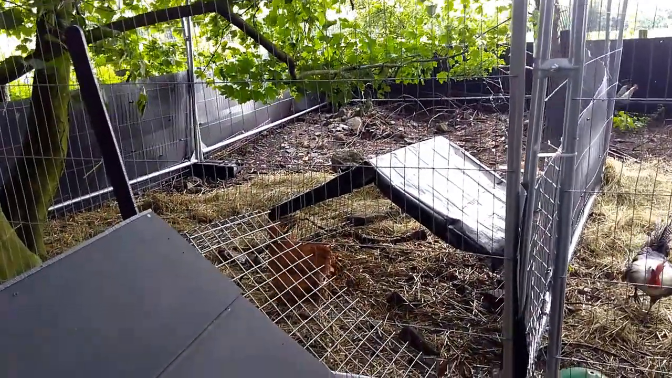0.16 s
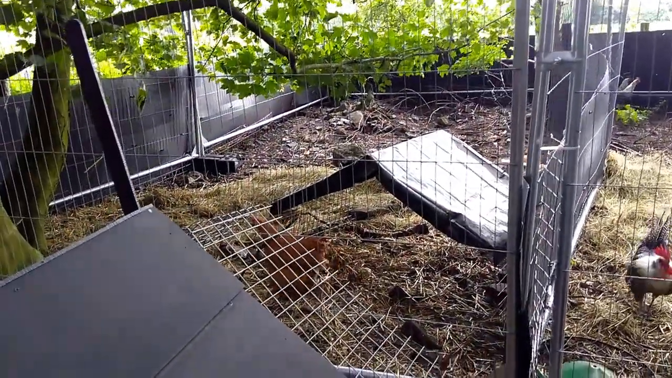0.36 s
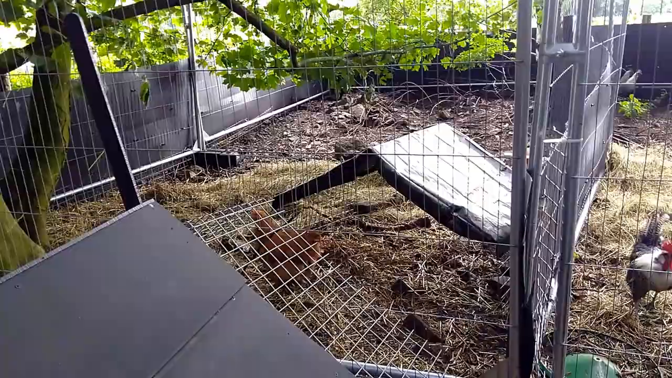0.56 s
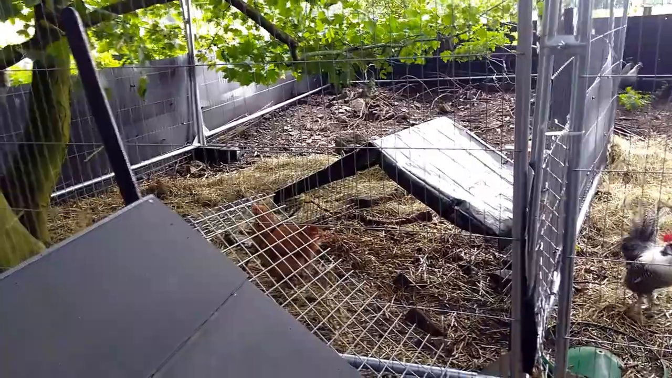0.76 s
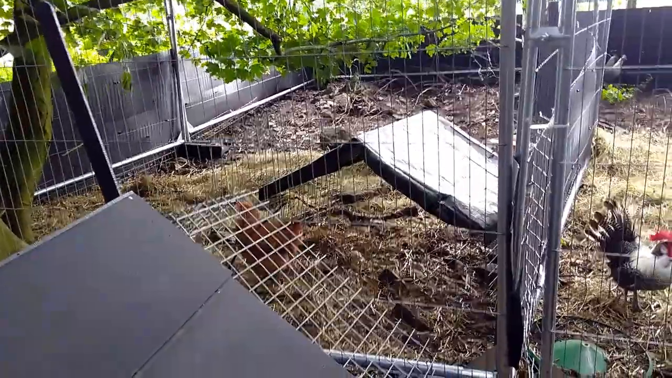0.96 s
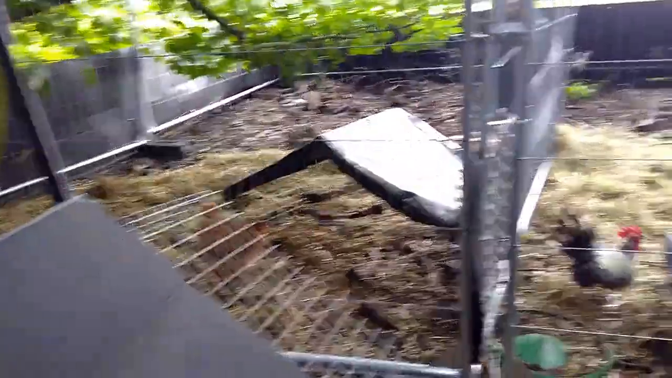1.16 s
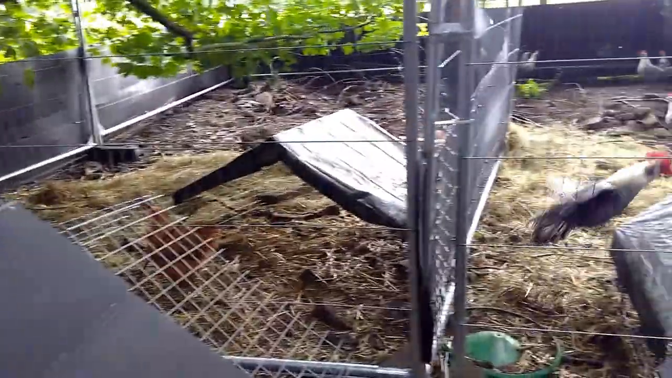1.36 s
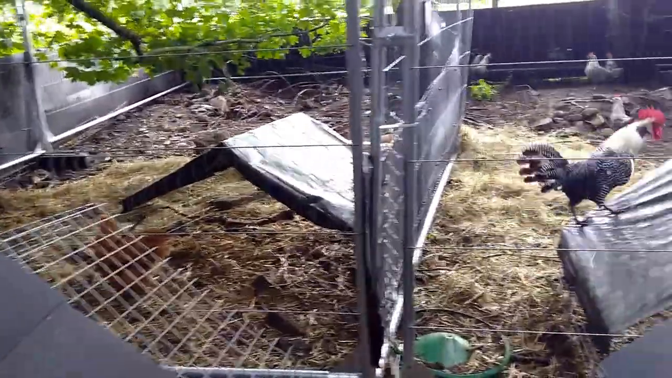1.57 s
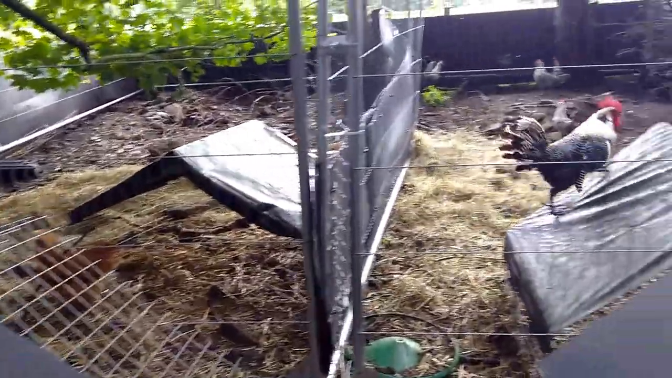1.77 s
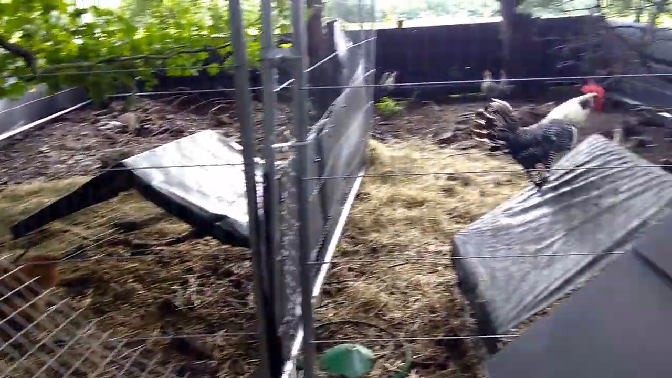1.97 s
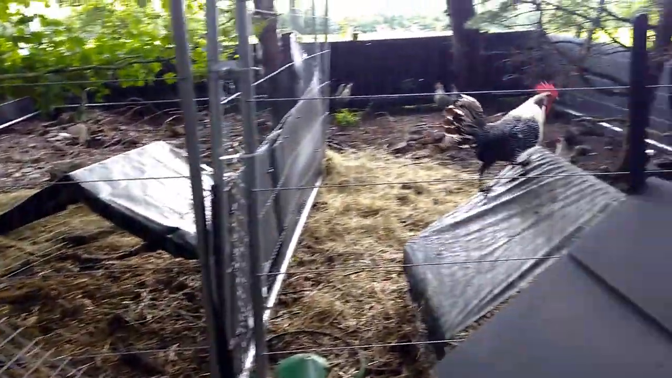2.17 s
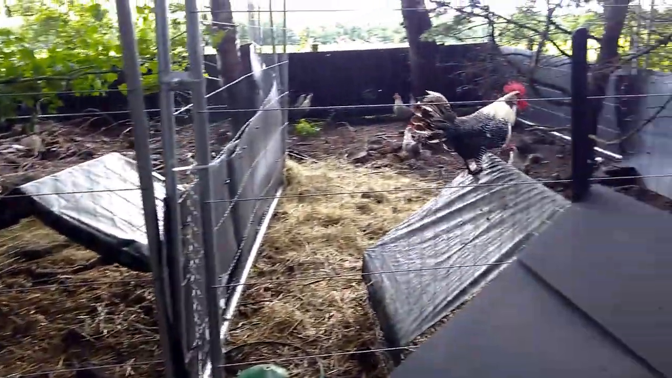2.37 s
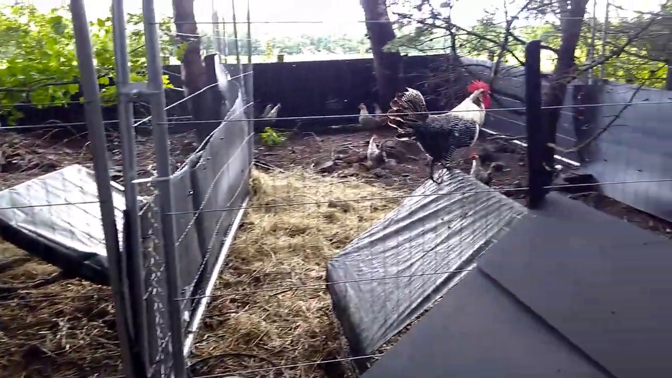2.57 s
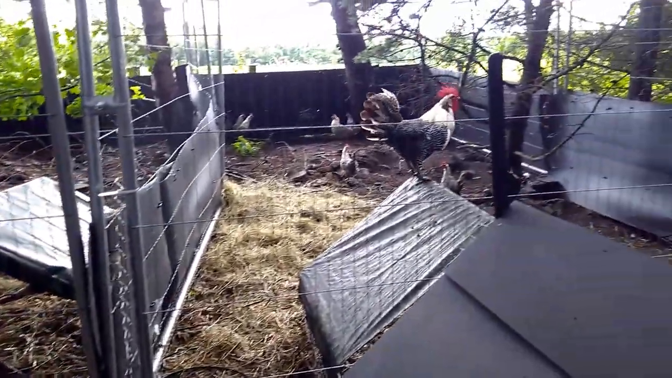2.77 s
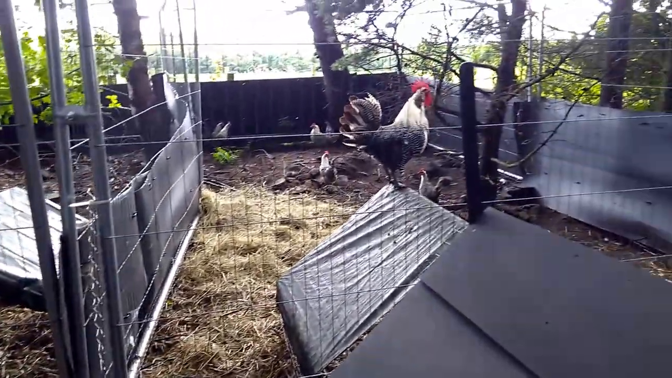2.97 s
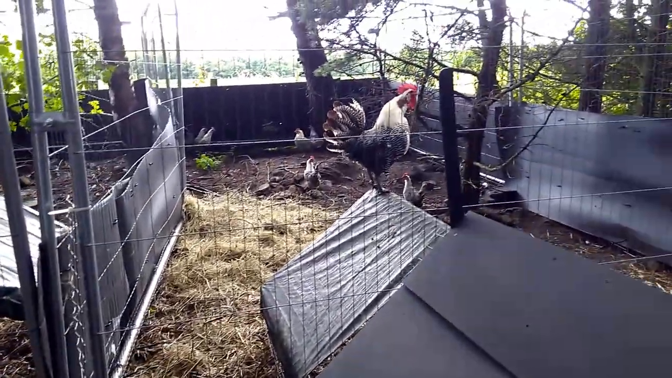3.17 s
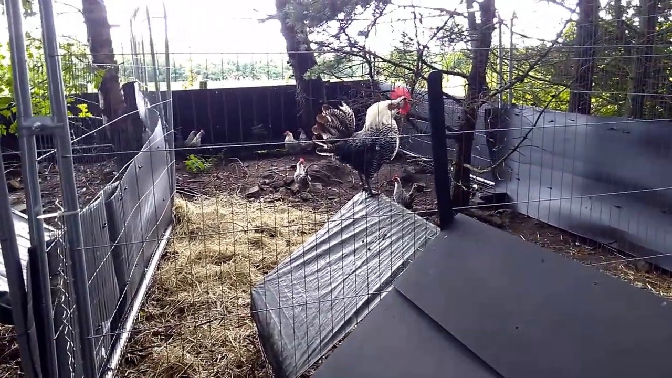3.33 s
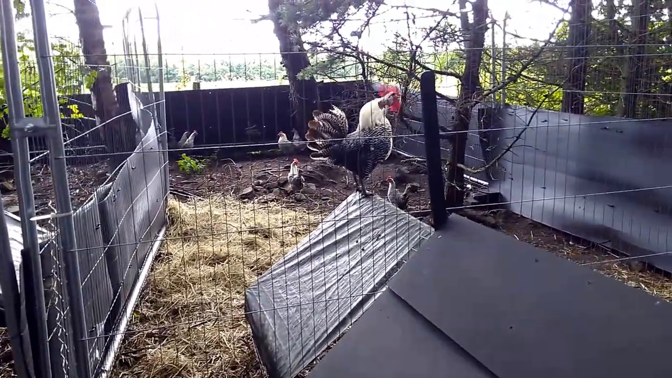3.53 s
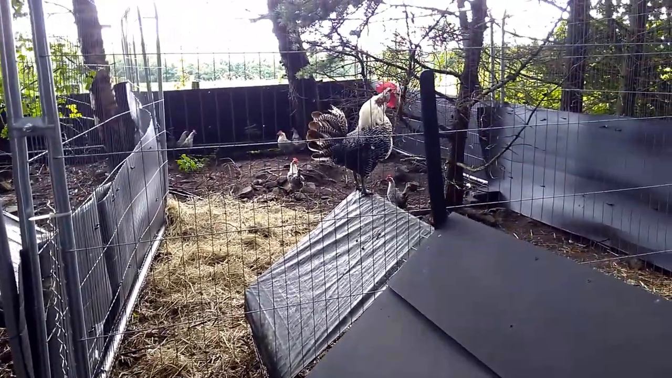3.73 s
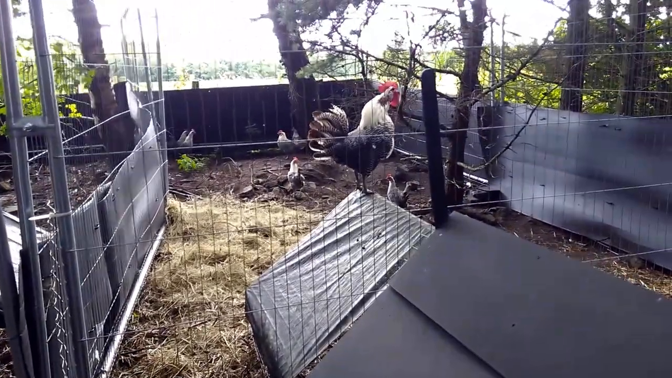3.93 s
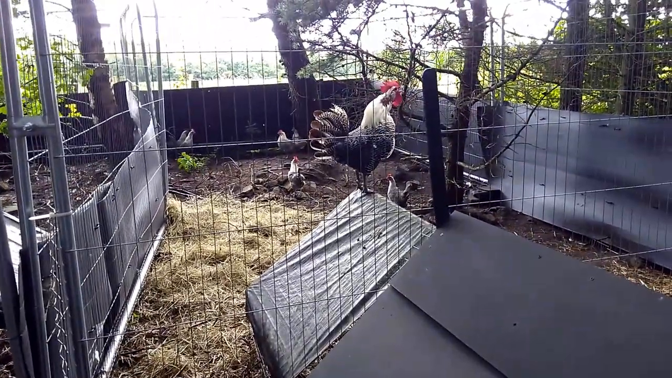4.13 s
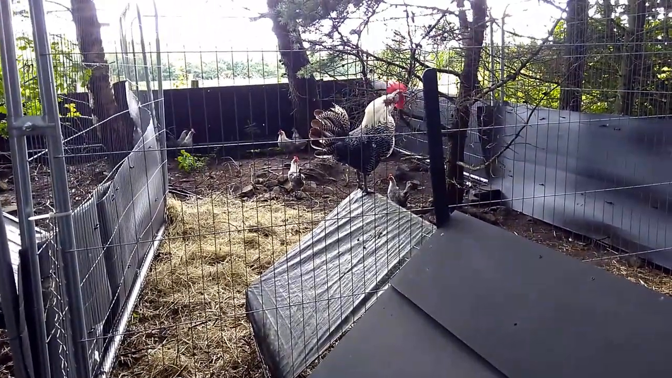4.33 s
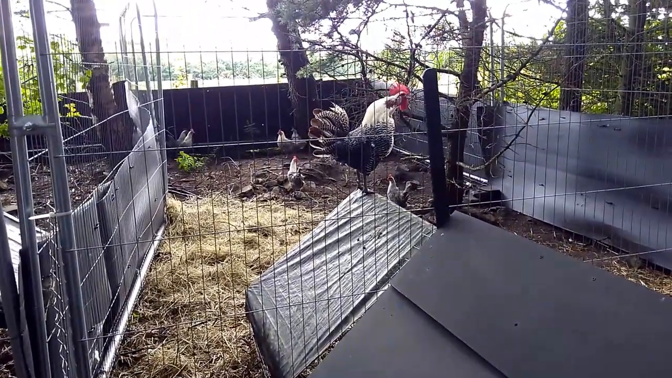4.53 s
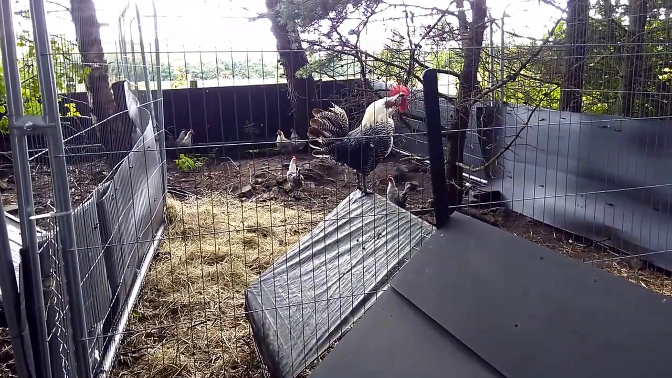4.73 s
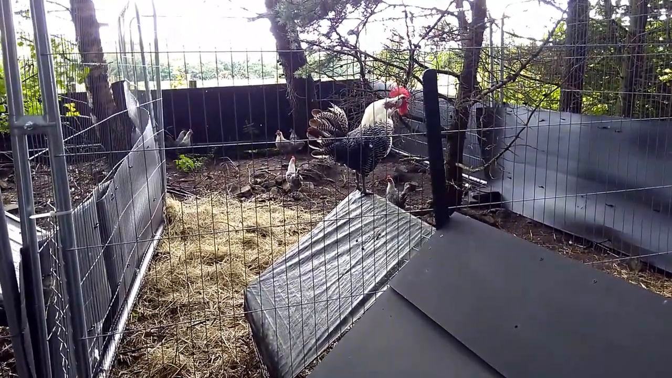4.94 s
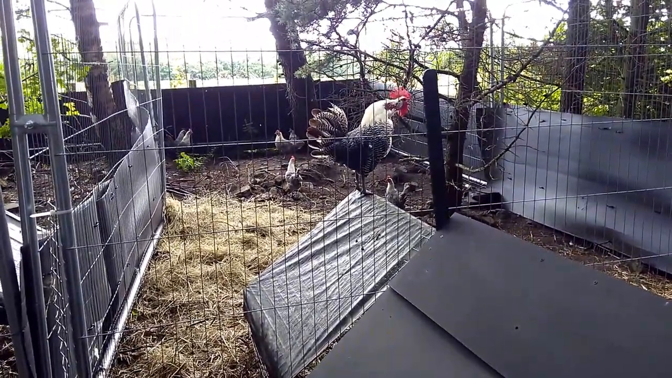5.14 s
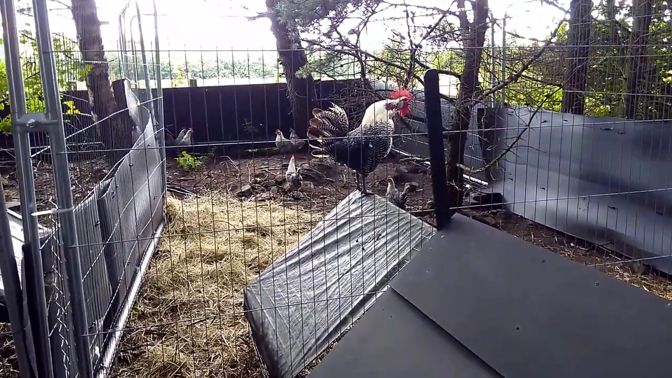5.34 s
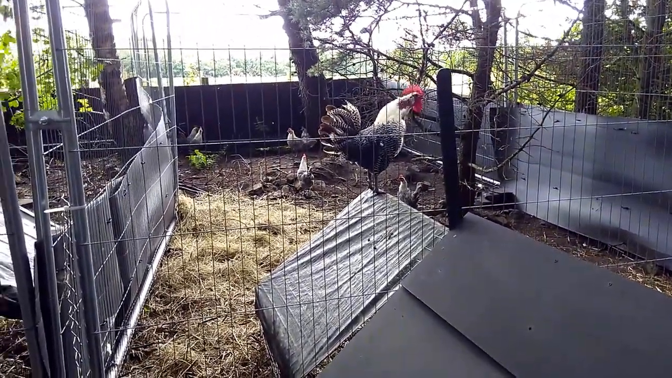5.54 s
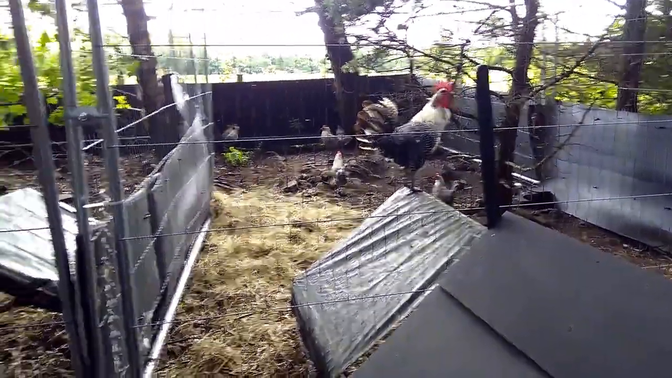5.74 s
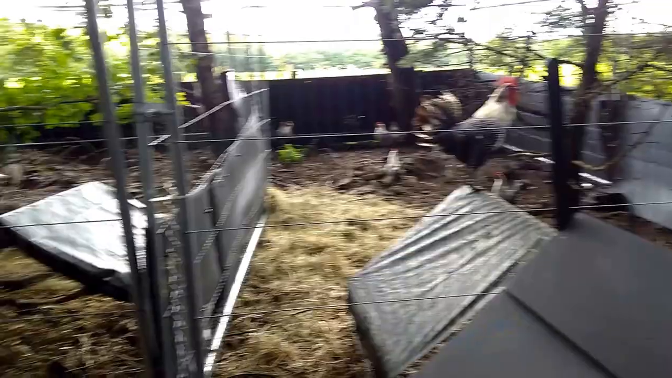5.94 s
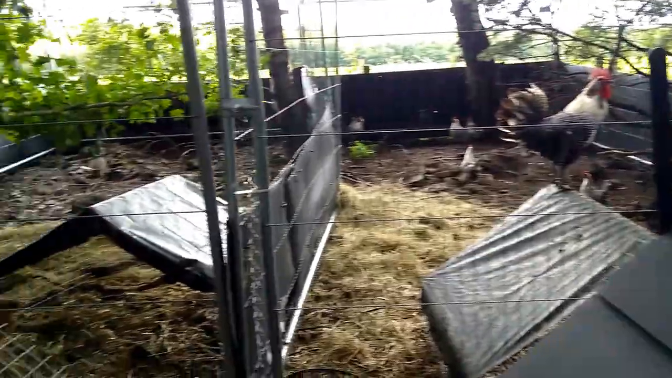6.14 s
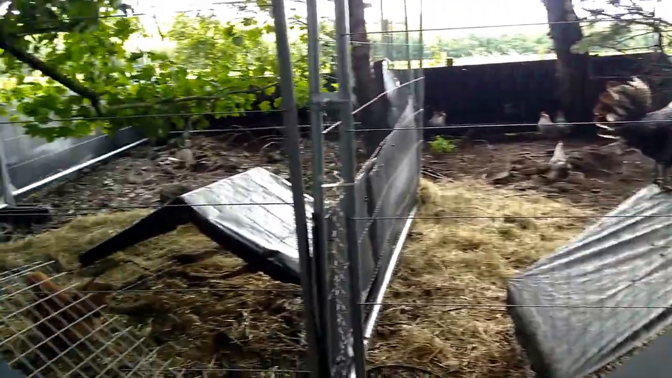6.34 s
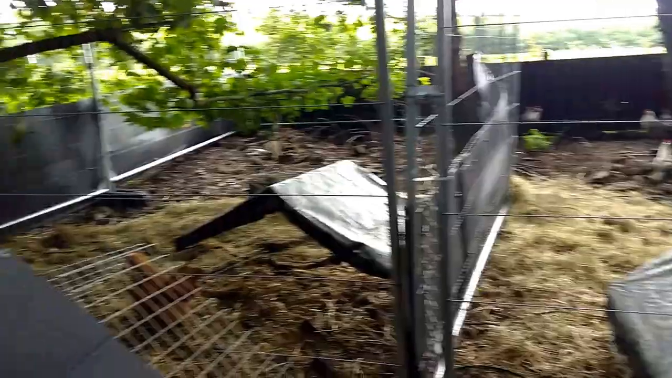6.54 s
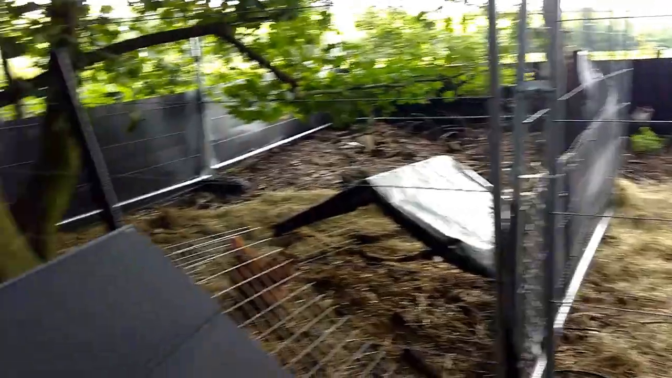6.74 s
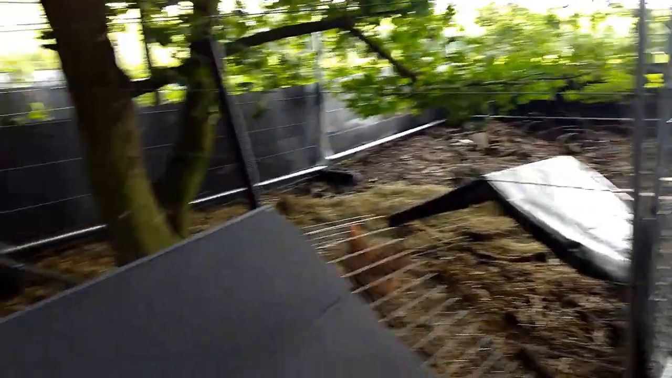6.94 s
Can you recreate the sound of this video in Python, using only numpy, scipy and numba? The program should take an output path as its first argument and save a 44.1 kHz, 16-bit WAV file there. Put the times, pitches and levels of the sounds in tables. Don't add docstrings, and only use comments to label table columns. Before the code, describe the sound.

Outdoors in a fenced poultry yard, a phone a few metres from the action hears a faint steady bed of far traffic, leaf hiss and low, uneven wind buffeting. Around 0.6 to 0.9 s, distant hens give a few soft low clucks. From about 1.0 to 2.3 s a rooster flaps up onto a tarpaulin roof: airy wing whooshes, plastic rustle and sharp claw snaps that ring briefly, strongest near 1.45, 1.7, 1.9 and 2.2 s. Wind thumps knock the case near 1.2 and 1.7 s. It settles, with small ticks to 2.7 s. At 3.4 s it crows hoarsely: an abrupt sagging syllable, a short higher one at 3.7, a swelling one from 3.8 to 4.25, then a long, slightly lower cry from 4.4 to 5.5, cut off quickly with a short fence echo. The background dips during it and creeps back; a faint tick at 6.2, a wind thump near 6.65 and stirring leaves at 6.8 s end it.

```python
import sys
import numpy as np
from scipy import signal
from scipy.fft import rfft, irfft
from scipy.io import wavfile
from scipy.ndimage import uniform_filter1d, minimum_filter1d
from numba import njit

SR = 44100
rng = np.random.default_rng(int(sys.argv[2]) if len(sys.argv) > 2 else 0)


def transcribe(signal):
    frames = np.atleast_2d(signal).T
    limited = np.clip(frames, -1, 1)
    pcm = np.round(limited * 32767).astype(np.int16)
    wavfile.write(sys.argv[1], SR, pcm)


def volts(x):
    e = np.asarray(x, float) / 20
    return 10 ** e


N = 308700
T = np.arange(N) / SR
HZ = np.fft.rfftfreq(N, 1 / SR)


def unit(x):
    return x / np.sqrt(np.mean(x ** 2))


def peak(x):
    return x / np.abs(x).max()


def walk(rate_hz):
    hold = int(SR / rate_hz)
    steps = np.repeat(rng.standard_normal(N // hold + 1), hold)
    return 1.84 * uniform_filter1d(uniform_filter1d(steps, hold), hold)[:N]


def swell(s, rise_s, fall_s):
    return np.exp(-np.where(T < s, (s - T) / rise_s, (T - s) / fall_s))


def noise(shape, alike, flicker_db, grain_db=0.):
    hz, db = np.transpose(shape)
    colour = volts(np.interp(np.log(HZ + 1), np.log(hz), db, left=-80, right=-80))
    raw = rng.standard_normal((3, N)) * volts(grain_db * walk(300) + flicker_db * walk(18))
    shared, a, b = (unit(irfft(rfft(r) * colour, N)) for r in raw)
    return np.sqrt(alike) * shared + np.sqrt(1 - alike) * np.array([a, b])


@njit
def band(x, hz, width):
    y, b, l = np.empty(len(x)), 0., 0.
    for i in range(len(x)):
        g, k = np.tan(np.pi * hz[i] / SR), width / hz[i]
        v = (b + g * (x[i] - l)) / (1 + g * (g + k))
        b, l, y[i] = 2 * v - b, l + 2 * g * v, k * v
    return y


def ring(x, hz, width_hz):
    return band(x, np.full(len(x), hz, float), float(width_hz))


def steep(x, hz, width_hz):
    return ring(ring(x, hz, width_hz), hz, width_hz)


# (from [s], held until [s], depth [dB], recovery [s])
DUCKS = [
    (2.22, 2.316, -10, 0.41),
    (3.45, 5.558, -5, 0.32),
]


def duck_db():
    total = 0
    for s, until, db, back_s in DUCKS:
        down = np.clip((T - s) / 0.039, 0, 1)
        total = total + db * down * np.exp(-np.clip(T - until, 0, None) / back_s)
    return total


# (frequency [Hz], level [dB])
TRAFFIC_SPECTRUM = [(120, 3.5), (250, 2), (400, -2.5), (650, -1), (1000, -9), (1600, -20), (2300, -55),
                    (3500, -55), (6000, -61)]
RUSTLE_SPECTRUM = [(500, -9.5), (1000, 2), (2000, 3), (3700, -7.5), (5500, -14), (8000, -13.5),
                   (16000, -26)]
LEAF_SPECTRUM = [(3000, -12.5), (6000, -9.5), (9000, -1.5), (12000, -1.5), (15000, -1), (17000, -23)]
# (time [s], hiss [dB], tarpaulin rustle [dB], rise [s], fall [s])
STIRS = [(.21, -65.5, -77, .1, 0.32), (.58, -60, -90, 0.077, .2), (1.01, -54, -103, 0.025, .03),
         (1.1, -39, -83, 0.039, 0.066), (1.321, -32, -59, 0.011, 0.055), (1.449, -51, -43, 0.0087, 0.019),
         (1.5, -52, -60, 0.015, .15), (1.67, -44, -52, 0.016, 0.042), (1.86, -50, -49, 0.04, 0.086),
         (1.91, -53, -78, 0.066, 0.054), (2.052, -36.5, -54.5, 0.0039, 0.096),
         (2.215, -65, -61, .03, 0.011), (2.28, -63, -63.5, 0.03, 0.24), (2.6, -68, -93, 0.0056, 0.027),
         (2.66, -49, -93, 0.004, 0.029), (3.03, -86, -75, 0.13, 0.078), (3.32, -57.5, -92.5, 0.065, 0.095),
         (6.4, -77, -81, 0.066, 0.034), (6.8, -51, -80, 0.047, 1)]


def yard():
    hiss_db, sheet_db, traffic_db = -58, -67, -43
    gain = volts(duck_db())
    leaves, rustle = gain * volts(hiss_db), gain * volts(sheet_db)
    for s, leaf_db, rustle_db, rise_s, fall_s in STIRS:
        stir = swell(s, rise_s, fall_s)
        leaves = leaves + volts(leaf_db) * stir
        rustle = rustle + volts(rustle_db) * stir
    traffic = gain * volts(traffic_db + 1.43 * walk(3.777))
    out = volts(0.5) * traffic * noise(TRAFFIC_SPECTRUM, alike=0.72, flicker_db=0.92)
    out += volts(9.5) * rustle * noise(RUSTLE_SPECTRUM, alike=0.058, flicker_db=1.25, grain_db=1.5)
    out += volts(-3.5) * leaves * noise(LEAF_SPECTRUM, alike=0.055, flicker_db=-1.8, grain_db=0.5)
    return out


# (frequency [Hz], level [dB])
GUST_SPECTRUM = [(25, -47), (50, 2.5), (100, 3), (150, -6), (250, -22), (400, -26.5)]
# (time [s], peak [dB], length [s])
GUSTS = [(.15, -57.5, .15), (0.343, -60, 0.033), (.47, -73, 0.038), (0.743, -46, 0.031), (.88, -53, 0.051),
         (1.064, -57, 0.036), (1.24, -45, 0.034), (1.44, -42, 0.075), (1.66, -48, 0.027),
         (1.716, -49, 0.027), (1.908, -63, 0.081), (2.01, -49, .04), (2.237, -50.5, 0.044),
         (2.65, -46, 0.034), (2.82, -55, 0.15), (3.19, -72, 0.033), (3.382, -45, 0.032),
         (4.389, -65, 0.023), (4.78, -68, 0.043), (4.993, -52, .035), (5.447, -39, 0.027),
         (5.686, -63, 0.042), (5.84, -51, 0.034), (6.0, -67, 0.035), (6.223, -41, 0.041), (6.4, -44, 0.022),
         (6.675, -40.5, 0.053), (6.852, -57, 0.09)]
# (time [s], peak [dB], frequency [Hz], length [cycles])
KNOCKS = [
    (1.058, -37, 110, 3.1),
    (1.232, -27, 114, 1.9),
    (1.71, -30.5, 134, 4.4),
    (2.659, -64, 80.7, 1.8),
    (3.378, -35.5, 77, 4.4),
    (6.644, -30, 116, 4.7),
]


def wind():
    calm_db, duck_ratio = -62, 2.4
    force = volts(calm_db + duck_ratio * duck_db())
    for s, db, length_s in GUSTS:
        force = force + volts(db) * swell(s, 0.88 * length_s, 0.96 * length_s)
    out = force * volts(15) * noise(GUST_SPECTRUM, alike=0.57, flicker_db=4.0)
    for s, db, hz, cycles in KNOCKS:
        u = np.clip((T - s) * hz / cycles, 0, 1)
        push = np.sin(np.pi * u) ** 2 * np.sin(2 * np.pi * cycles * u)
        out += volts(db + 10.5) * push * np.array([[1.6], [-.3]])
    return out


def fences(x, wet_db, t60_s):
    t = T[:SR]
    tails = rng.standard_normal((2, SR)) * 10 ** (-3 * t / t60_s) * np.clip(t / 0.018, 0, 1)
    tails /= np.sqrt(np.sum(tails ** 2, axis=1, keepdims=True))
    return volts(wet_db) * signal.fftconvolve(x[None], tails, axes=1)[:, :N]


# (frequency [Hz], far port level [dB], far port lag [rad])
SHADE = [(497, 17, 0.1), (699, -4.5, -0.48), (846, 8, 1.56), (1015, 10.5, 4), (1150, 2, 0.47), (1384, 8, 2),
         (1744, -12.5, 2.), (2340, 0, 1), (2700, 8, 5), (2910, -3, 0), (3200, -14, -1.5), (4330, -13, -1.6),
         (5170, -5.5, 5.5), (6340, 2.5, 1.5)]


def arrive(x, wet_db, t60_s):
    hz, db, lag_rad = np.transpose(SHADE)
    shade = volts(np.interp(HZ, hz, db)) * np.exp(-1j * np.interp(HZ, hz, lag_rad))
    return np.array([x, irfft(rfft(x) * shade, N)]) + fences(x, wet_db, t60_s)


# (time [s], peak [dB], ring [Hz], treble re peak [dB], body peak [dB])
CLAWS = [(0.3276, -31.5, 2000, -15, -45), (1.01, -49.5, 3370, 31, -45), (1.2312, -53, 3000, -4, -35),
         (1.3248, -27, 3900, -15, -39), (1.3417, -45, 3640, -15, -21.5), (1.443, -24, 3220, 4, -43),
         (1.4489, -12, 2160, -11, -20), (1.459, -37, 2220, -14, -38), (1.5475, -36, 3000, -13, -48),
         (1.669, -13.5, 2100, -10, -24), (1.7978, -53, 3200, -10, -39.5), (1.8556, -28, 3570, -27, -18.5),
         (1.8637, -20, 3740, -4, -22), (1.913, -24, 3050, -4, -42), (1.9196, -14, 2200, 0, -46),
         (2.0494, -52.5, 2900, -6, -63.5), (2.1928, -19, 3680, -9, -42), (2.2192, -12, 3400, 2.5, -18),
         (2.2825, -13.5, 3400, -26, -44), (2.3223, -32, 4040, -6, -51), (2.4206, -54, 2840, -7, -38),
         (2.606, -59, 3300, -4, -55), (2.6576, -43, 3950, 15, -54), (6.232, -42, 3500, -23, -28.5)]


def claws():
    snap_t60_s, sheet_t60_s, answer_s = 0.0009, 0.017, 0.0079
    out, knock = np.zeros((2, N))
    t = T[:3000]
    for s, db, hz, treble_db, body_db in CLAWS:
        grit = rng.standard_normal(3000)
        snap = grit * 10 ** (-3 * t / snap_t60_s)
        hit = grit * 10 ** (-3 * t / sheet_t60_s) * np.clip(t / .0015, 0, 1)
        sheet = peak(ring(hit, hz, 480))
        tick = sheet + volts(-12) * np.roll(sheet, int(answer_s * SR))
        tick += volts(-9) * peak(ring(snap, 4000, 4900))
        tick += volts(treble_db + 0.5) * peak(ring(snap, 11000, 5700))
        body = peak(ring(1. * (t == 0) + 0.05 * hit, 1300, 760))
        i = int(s * SR)
        out[i:i + 3000] += volts(db - 7) * tick
        knock[i:i + 3000] += volts(body_db - 2) * body
    return arrive(out, wet_db=-21, t60_s=.08) + knock + fences(knock, wet_db=-12, t60_s=.08)


# (time [s], peak [dB], second partial [Hz], length [s])
CLUCKS = [
    (0.587, -30, 575, 0.029),
    (0.765, -28.5, 584, 0.026),
    (0.88, -39, 640, 0.07),
    (0.914, -32.5, 588, 0.031),
]


def hens():
    out = np.zeros(N)
    for s, db, hz, length_s in CLUCKS:
        u = np.clip((T - s) / length_s, 0, 1)
        turn = np.pi * hz * (T - s) * (1 - 0.026 * u)
        partials_db = [-2, -4.5, -10.5, -17]
        stack = sum(volts(d) * np.sin(k * turn + k * k) for k, d in enumerate(partials_db, 1))
        out += volts(db - 5.0) * np.clip(u / 0.063, 0, 1) * (1 - u ** 3) * stack
    return out + fences(out, wet_db=-18, t60_s=0.24)


# (start [s], swell [s], release at [s], level [dB], sag by the release [dB])
SYLLABLES = [
    (3.421, .008, 3.545, -17, -16.5),
    (3.689, 0.0033, 3.778, -20.5, 1.5),
    (3.831, 0.073, 4.252, -18, -3),
    (4.369, 0.049, 5.495, -19, -1),
]
RELEASES = [353, 323, 418, 864]


def crow_effort():
    start_db = -24.5
    effort = np.zeros(N)
    for (s, rise_s, until, db, sag_db), release in zip(SYLLABLES, RELEASES):
        onset = start_db * np.clip(1 - (T - s) / rise_s, 0, 1)
        sag = sag_db * np.clip((T - s) / (until - s), 0, 1) ** 2
        fade = release * np.clip(T - until, 0, 1)
        effort += (T > s) * volts(db + onset + sag - fade)
    return uniform_filter1d(effort, size=90)


@njit
def flaps(hz, stretch, size):
    pulses, phase, p, k = np.zeros(len(hz) + 1), np.empty(len(hz)), 0., 0
    for i in range(len(hz)):
        step = hz[i] * stretch[k] / SR
        p += step
        if p >= 1:
            p, k = p - 1, k + 1
            pulses[i] += size[k] * p / step
            pulses[i + 1] += size[k] * (1 - p / step)
        phase[i] = p
    return pulses[:-1], phase


def modes(drive, table):
    total = np.zeros(N)
    for k, (hz, width_hz, db) in enumerate(table):
        total += (-1) ** k * volts(db) * steep(drive, hz, 1.26 * width_hz)
    return unit(total)


# (frequency [Hz], width [Hz], level [dB])
THROAT = [(3050, 59, 18), (3590, 160, -9.5), (4430, 180, -38), (5700, 170, 0), (6170, 386, 7),
          (7160, 200, 0.5), (8000, 190, -1), (9160, 460, -7.5), (9840, 710, 0), (11070, 120, -2),
          (11680, 770, -5), (12870, 360, 0.5), (14140, 890, 1.5)]
# (frequency [Hz], width [Hz], level [dB], slope [dB per Hz of syrinx rate])
POCKETS = [
    (4590, 630, 8.5, -1.2),
    (3400, 360, 13.5, 0.35),
]
POCKET_RATES = [599.4, 721]


def throat_rasp(breath, rate):
    slack_hz, neck_follows = 675, 0.29
    neck = (rate / slack_hz) ** neck_follows
    rasp = np.zeros(N)
    for hz, width_hz, db in THROAT:
        rasp += volts(db + 1.93 * walk(11)) * steep(breath, hz * neck, 1.53 * width_hz)
    for (hz, width_hz, db, slope), open_hz in zip(POCKETS, POCKET_RATES):
        opening_db = np.minimum(slope * (rate - open_hz), 0)
        rasp += volts(db + opening_db) * steep(breath, hz * neck, width_hz)
    return unit(rasp)


# (time [s], syrinx rate [Hz], beak resonance [Hz], chest [dB], gape [dB])
POSTURE = [
    (3.429, 606.2, 1616, 0, -10),
    (3.6, 658.7, 1665, -8, -10),
    (3.69, 732, 1760, -6, -5.5),
    (3.801, 740.1, 1700, -3.5, -1),
    (3.9, 713.5, 1665, -6, -4),
    (4.27, 709.3, 1733, -10, -2),
    (4.42, 634.2, 1664, -8.5, -8),
    (4.9, 609, 1735, -11.5, -9.5),
    (5.48, 605.6, 1770, -4.5, -16.5),
]
# (frequency [Hz], width [Hz], level [dB])
GAPE = [(1093, 109, -0.5), (1258, 79, -2.5), (1438, 254, -14)]
# (frequency [Hz], width [Hz], level [dB])
PIPE = [(1977, 75, -5), (2150, 95, -4.5), (2350, 240, -14.5), (2810, 690, -23.5)]


def rooster():
    breath_db, breath_lag_s = -17.5, 0.015
    chest_steals = 1
    s, *columns = np.transpose(POSTURE)
    rate, beak, chest_db, gape_db = (np.interp(T, s, c) for c in columns)
    effort = crow_effort()
    keep = np.exp(-1 / (breath_lag_s * SR))
    airflow = signal.lfilter([1 - keep], [1, -keep], effort)

    length_chance, size_chance = rng.standard_normal((2, N // 30))
    pulses, phase = flaps(rate, np.clip(1 + .095 * length_chance, .6, 1.6), volts(4. * size_chance))
    breath = unit(np.exp(-phase / 0.49) * rng.standard_normal(N))
    drive = unit(ring(pulses, 1500, 4000)) + 1.2 * breath

    chest = steep(drive, rate, 157)
    chest -= volts(-3.0) * steep(drive, 790, 162)
    chest -= volts(-6.5) * steep(drive, 595, 120)
    mouth = unit(steep(drive, beak, 201))
    pipe_db = 1.5 - chest_steals * np.clip(chest_db + 7.5, 0, None)
    voice = volts(chest_db - 0.5) * unit(chest) + volts(gape_db) * modes(drive, GAPE)
    voice += volts(pipe_db) * modes(drive, PIPE) - volts(1.0) * mouth
    voice = signal.sosfilt(signal.butter(4, [530, 2700], "band", fs=SR, output="sos"), voice)

    call = effort * voice + airflow * volts(breath_db) * throat_rasp(breath, rate)
    tone = effort * unit(ring(mouth, beak, 90))
    return volts(-1.5) * arrive(call, wet_db=-9.5, t60_s=0.26) + fences(tone, wet_db=-17, t60_s=0.51)


def scene():
    return yard() + wind() + claws() + hens() + rooster()


def band_limit(x):
    return signal.sosfilt(signal.butter(12, 16670, fs=SR, output="sos"), x)


def record(dry):
    port_lag_s = 0.0004033
    lag = np.exp(-2j * np.pi * HZ * port_lag_s)
    delayed = irfft(rfft(dry) * lag / (1 + (HZ / 8000) ** 4), N)
    lean_db = np.array([[-.7], [.7]]) / (1 + (HZ / 1300) ** 4)
    sides = irfft(rfft(dry - delayed[::-1]) * volts(lean_db), N)
    sides = signal.sosfilt(signal.ellip(8, .3, 50, 15600, fs=SR, output="sos"), sides)
    room = np.minimum(1, .93 / (np.abs(sides).max(axis=0) + 1e-9))
    sides = sides * uniform_filter1d(minimum_filter1d(room, size=301), size=300)
    return band_limit(sides)


dry = scene()
out = record(dry)
transcribe(out)
```